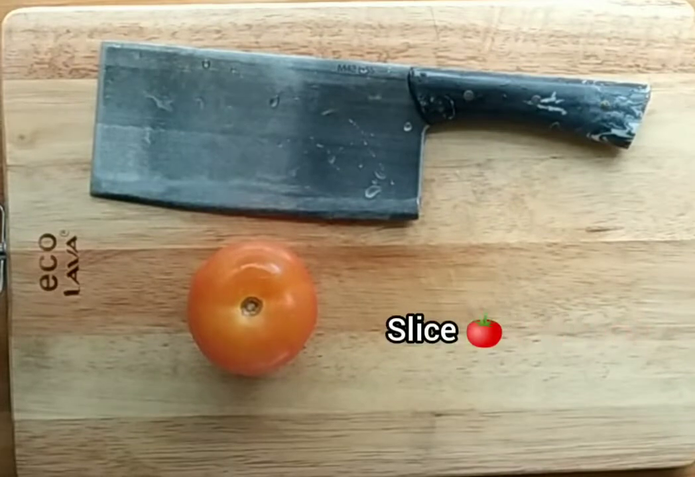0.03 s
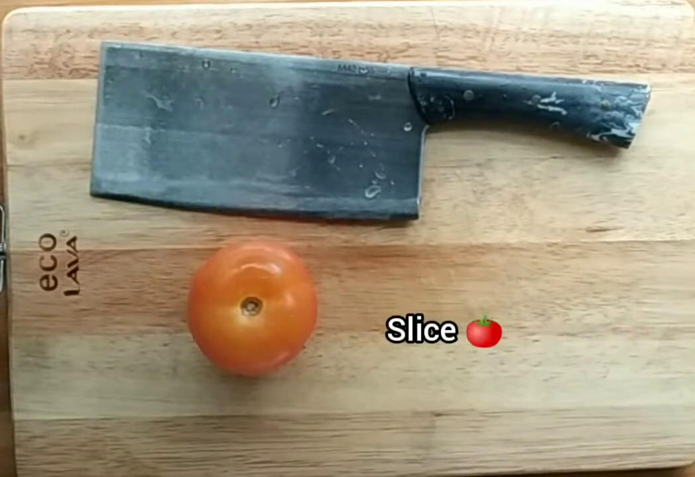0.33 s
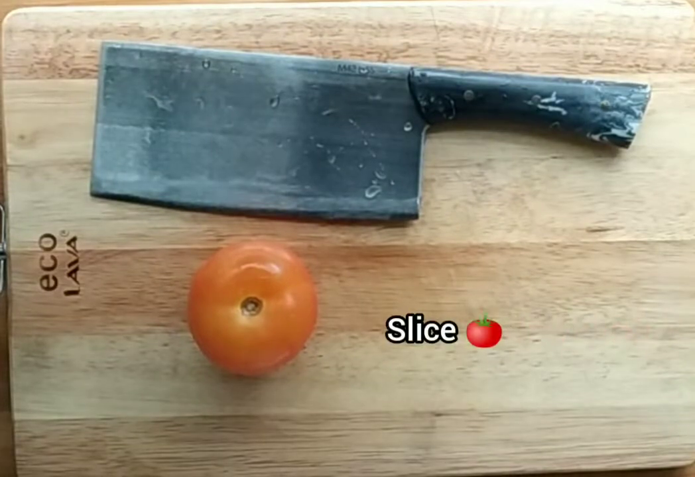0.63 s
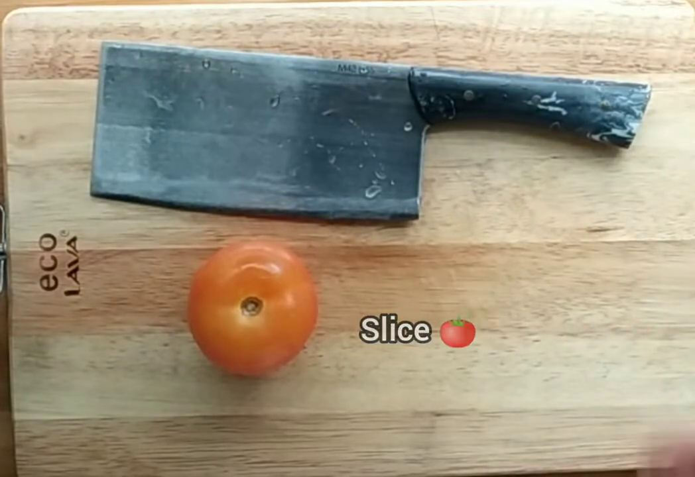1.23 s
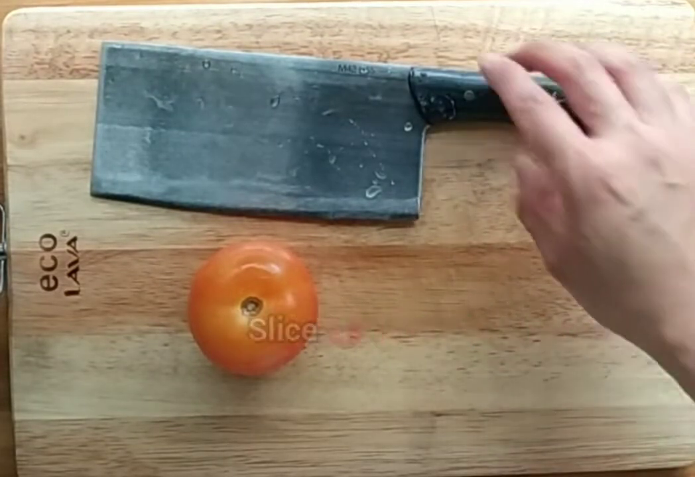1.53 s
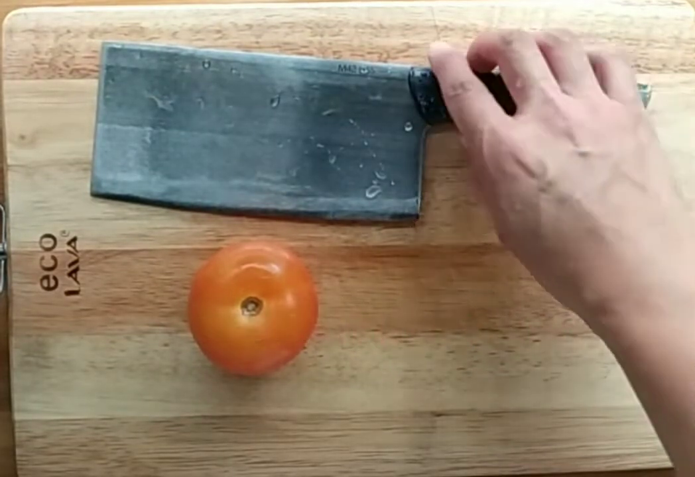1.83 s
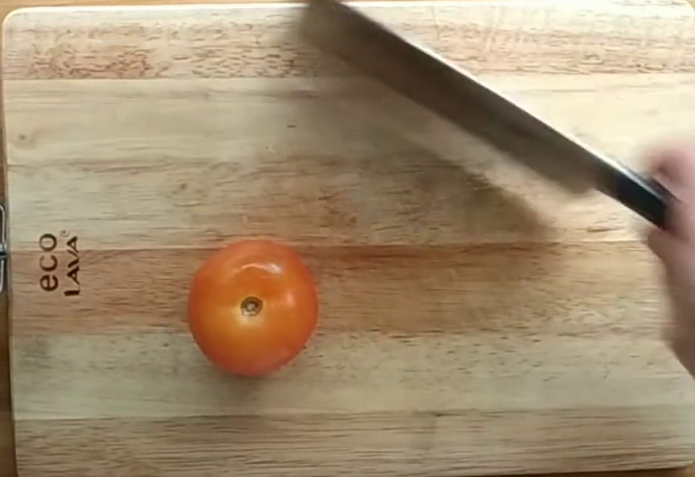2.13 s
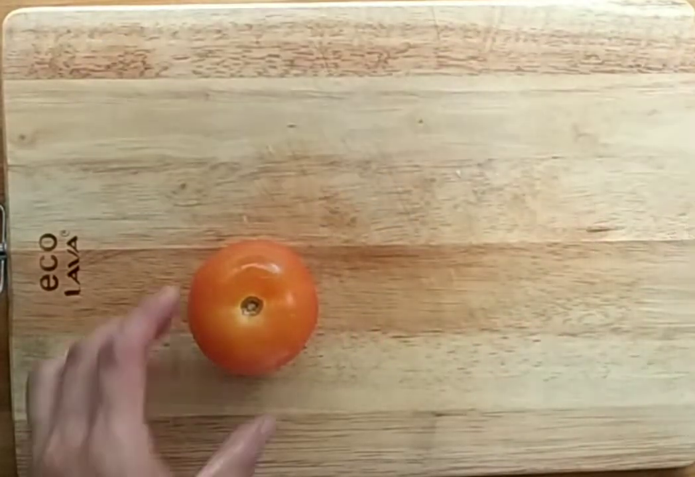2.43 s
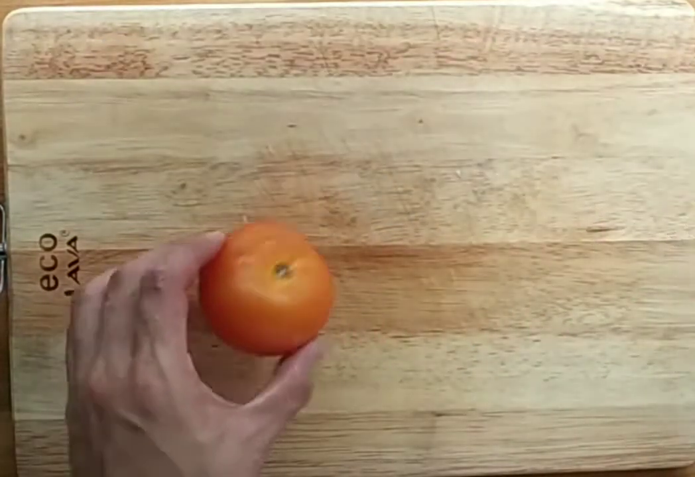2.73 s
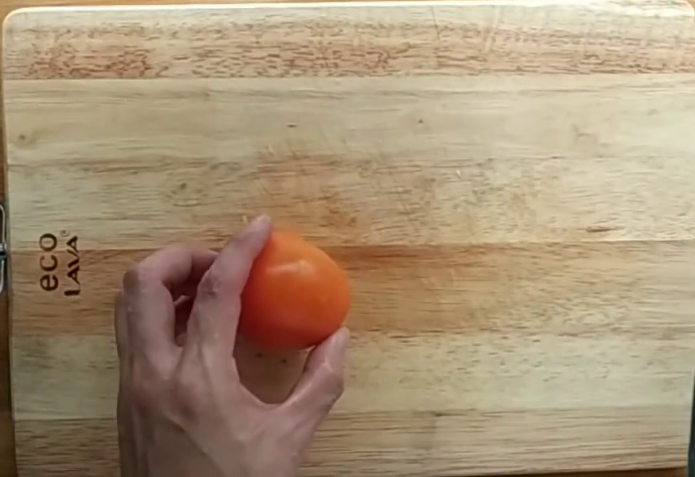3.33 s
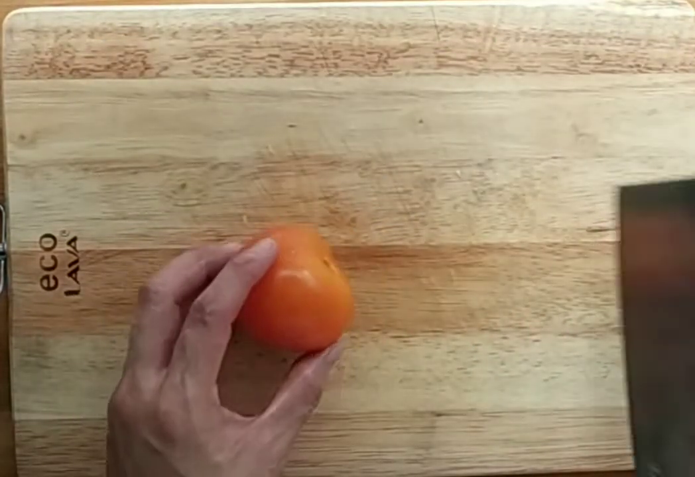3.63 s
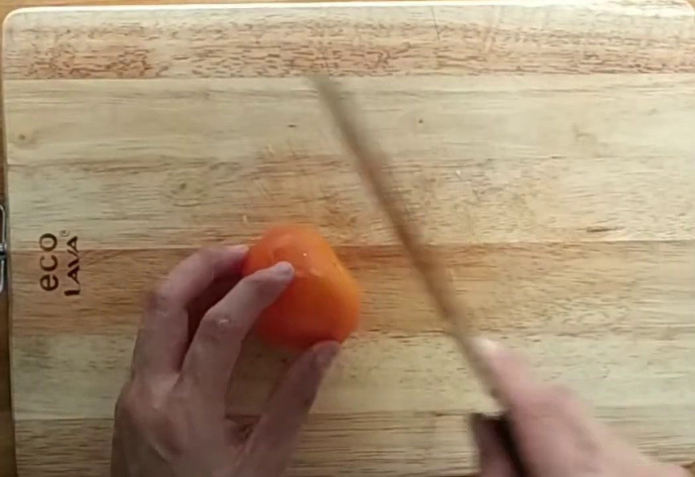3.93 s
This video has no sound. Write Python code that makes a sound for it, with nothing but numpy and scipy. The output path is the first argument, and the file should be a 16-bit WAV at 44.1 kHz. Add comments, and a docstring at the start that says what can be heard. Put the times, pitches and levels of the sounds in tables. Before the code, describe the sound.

A steel cleaver scrapes off a wooden board with a bright clink in a quiet kitchen.

```python
"""In a quiet kitchen, a steel cleaver is lifted off a wooden board. Soft rustles come first as the arm
reaches in, with a faint, far tink and whir. The handle bumps, then the edge scrapes over the wood:
friction excites the blade's modes, which the board damps until the steel comes free with a bright clink.
Behind it all are a low room hum and a thin, high whine that rises about once a second."""
import sys
import numpy as np
from scipy import signal
from scipy.fft import rfft, irfft, next_fast_len
from scipy.io import wavfile
from scipy.ndimage import map_coordinates

SR = 44100
rng = np.random.default_rng(int(sys.argv[2]) if len(sys.argv) > 2 else 0)


def wav_record(signal):
    """Record a signal, one row per channel, as 16-bit PCM in the file named by sys.argv[1]."""
    frames = np.transpose(np.atleast_2d(signal))
    bounded = np.clip(frames, -1, 1)
    # unit amplitude maps onto the largest positive 16-bit level
    quanta = np.round(bounded * 32767).astype(np.int16)
    wavfile.write(sys.argv[1], SR, quanta)


N = 176400
T = np.arange(N) / SR

# Spectra of the room noise, the rustles and the scrape: f/Hz, relative spectral level/dB
ROOM_SPECTRUM = [(12, -33.5), (20, -3), (36, -3), (62, -12), (105, -8), (160, -10), (220, -16),
                 (400, -22.5), (700, -25), (1700, -30.5), (3000, -39.5), (4500, -46.5), (8500, -48),
                 (10700, -52), (11600, -53.5), (15400, -57.5)]
RUSTLE_SPECTRUM = [(500, -6), (2500, -6), (4500, -5.5), (6500, -4), (8500, 1), (10000, -1.5), (12000, -3.5),
                   (15000, -12)]
SCRAPE_SPECTRUM = [(300, -37), (2500, -18), (4000, -9), (6000, -10), (8300, 0), (10000, -5), (12200, 3),
                   (14300, -8), (15300, -3)]
# Coherence of left and right for far and near sources: f/Hz, correlation
FAR_COHERENCE = [(30, 0.95), (125, .96), (250, 0.89), (500, 0.58), (1000, -0.052), (2000, 0.0023),
                 (8000, -0.025)]
NEAR_COHERENCE = [(300, 1), (1000, 0.14), (4000, 0.099), (12000, 0.19)]
# Tones of the hum: f/Hz, initial level/dB
HUM_TONES = [(29, -43), (57.5, -46.5), (91, -49.5)]
# Rustles of the arm: onset t/s, attack/s, hold/s, t60/s, level/dB
RUSTLE_BURSTS = [(.1, .2, .65, 1.2, -63.5), (.335, .05, 0.04, 0.45, -56.5), (0.733, .025, 0.013, 0.23, -58),
                 (0.822, 0.02, 0.012, 0.28, -53.5), (0.879, 0.021, .02, 0.28, -56),
                 (1.462, .035, .035, .3, -57.5), (1.595, .02, .01, .3, -59.5),
                 (1.762, 0.041, 0.023, 0.56, -48), (1.907, 0.025, .02, 0.75, -50.5)]
# Resonances of the tink, the handle and the blade lying on the board: f/Hz, width/Hz, relative level/dB
TINK_RESONANCE = [(5450, 330, 0)]
HANDLE_RESONANCES = [(393, 130, 1.5), (830, 350, -5), (1500, 640, -18)]
BOARD_RESONANCES = [(800, 260, 0), (1206, 200, -5), (1562, 91, 0.5), (1818, 310, -4.5), (2344, 110, -2),
                    (2900, 230, -8)]
# Friction force of the edge on the wood: t/s, relative level/dB
DRAG_FORCE = [(1.99, -40.5), (2.011, -9), (2.026, -4), (2.05, -5), (2.067, 2), (2.083, 1.5), (2.097, -8.5),
              (2.122, -20), (2.17, -21), (2.25, -70)]
# Normal modes of the blade: f/Hz, relative level/dB, t60/s, left minus right/dB
BLADE_MODES = [(2617, -26, .3, 6), (2904, -26, .22, -9), (3803, -23, .2, -2), (3956, -23, .2, 6),
               (4104, -20, .2, -5), (4827, -21, .19, 11), (4984, -24, .2, 4), (5325, -28, .2, -9),
               (5824, -28, .2, 5), (6235, -27, .45, -6), (6932, -23, .16, -1), (7449, 0, .26, -12),
               (7745, -12, .27, 3), (7830, -3, .33, -2), (7971, -17, .28, -10), (8093, -15, .24, -9),
               (8388, -14, .24, 3), (8525, -9, .21, -9), (8673, -18, .2, -3), (9039, -22, .18, -5),
               (9411, -19, .16, 4), (9594, -17, .16, 0), (9747, -21, .16, 3), (10328, -8, .14, 7),
               (10749, -20, .18, -2), (11054, -15, .2, 0), (11571, -17, .2, 1), (11701, -20, .2, 2),
               (11990, -10, .18, 3), (12070, -13, .18, 2), (12427, -13, .21, 7), (12968, -16, .22, -2),
               (13316, -23, .22, 8), (13790, -18, .2, -7), (14790, -27, .18, 2), (15164, -20, .22, 1),
               (15370, -23, .2, 0)]
# Reverberation time of the kitchen: f/Hz, t60/s
KITCHEN_T60 = [(200, 0.31), (2000, 0.27), (8000, 0.35), (15000, 0.26)]

DRAG_START = int(DRAG_FORCE[0][0] * SR)
RINGING = slice(DRAG_START, DRAG_START + int(.6 * SR))  # the samples in which the blade sounds


def amp(db):
    """Amplitude ratio of a level in decibels."""
    return 10 ** (np.asarray(db) / 20)


def unit(x):
    """Normalisation to rms 1."""
    return x / np.sqrt(np.mean(x ** 2) + 1e-20)


def along(points, hz):
    """Interpolation of (f/Hz, value) points on a logarithmic frequency axis."""
    f, v = np.transpose(points)
    return np.interp(np.log(hz + 1), np.log(f + 1), v)


def wobble(rate, t=T):
    """Random modulation: a smooth curve through `rate` Gaussian values a second."""
    return map_coordinates(rng.standard_normal(int(N * rate / SR) + 4), [t * rate])


def filtered(x, response):
    """Linear filtering: the spectrum is multiplied by a frequency response."""
    m = next_fast_len(N + SR // 2)
    return irfft(rfft(x, m) * response(np.fft.rfftfreq(m, 1 / SR)), m)[..., :N]


def colour(points):
    """Spectral envelope through (f/Hz, level/dB) points."""
    return lambda hz: amp(along(points, hz))


def resonances(peaks):
    """Superposition of squared band-pass responses, alternating in sign."""
    return lambda f: sum((-1) ** k * amp(db) * (1j * f * width / (hz * hz - f * f + 1j * f * width)) ** 2
                         for k, (hz, width, db) in enumerate(peaks))


def noise(response, coherence):
    """Partially coherent stereo noise of rms 1: the ratio of mid to side sets the correlation."""
    def mid_side(hz):
        angle = np.arccos(np.clip(along(coherence, hz), -1, 1)) / 2
        return response(hz) * np.array([np.cos(angle), np.sin(angle)])
    mid, side = filtered(rng.standard_normal((2, N)), mid_side)
    return unit(np.array([mid + side, mid - side]))


def gliding_band(hz, width_hz):
    """Frequency shifting: a gliding carrier moves low-pass noise to a narrow band near hz."""
    baseband = noise(lambda f: np.exp(-(f / width_hz) ** 2), FAR_COHERENCE[-1:])
    carrier = np.exp(2j * np.pi * np.cumsum(hz - width_hz / 2) / SR)
    return unit(np.real(signal.hilbert(baseband) * carrier))


def envelope(start, attack, hold, t60, db):
    """Linear attack, hold and exponential decay, with times in seconds."""
    fall = np.maximum(T - start - attack - hold, 0) / t60
    return np.clip((T - start) / attack, 0, 1) * amp(db) * np.exp(-np.log(1000) * fall)


def room_hum(fade_db_per_s=1.3):
    """Superposition of steady broadband rumble and low tones that waver and slowly fade."""
    tones = sum(amp(db + 1.7 * wobble(4)) * np.sqrt(2) * np.sin(2 * np.pi * hz * T + .86 * wobble(5))
                for hz, db in HUM_TONES)
    rumble = amp(-38.5) * noise(colour(ROOM_SPECTRUM), FAR_COHERENCE)
    return rumble + amp(-fade_db_per_s * T) * tones


def whine(period_s=1.14, restart_s=.39, fade_s=.08, low_hz=9400, high_hz=9940):
    """Sawtooth modulation: a narrow band climbs, swells and starts again, over a steady hiss."""
    cycle = (T - restart_s) / period_s % 1
    band = gliding_band(low_hz + (high_hz - low_hz) * cycle, width_hz=540)
    level_db = -61.5 + 12 * np.minimum(cycle - .7, 0)  # full from 70 % of the cycle
    fade = np.sqrt(np.clip((1 - cycle) * period_s / fade_s, 0, 1))
    hiss = amp(-64) * noise(resonances([(9490, 1560, 0)]), FAR_COHERENCE)
    return fade * amp(level_db) * band + hiss


def rustles():
    """Light friction, as of a sleeve, gives soft bursts of broadband noise."""
    bursts = sum(envelope(*row) for row in RUSTLE_BURSTS)
    return bursts * unit(amp(.96 * wobble(300)) * noise(colour(RUSTLE_SPECTRUM), NEAR_COHERENCE))


def tink():
    """A single narrow resonance sounds faintly across the room and decays."""
    ring = noise(resonances(TINK_RESONANCE), FAR_COHERENCE)
    return envelope(start=.12, attack=.07, hold=.005, t60=.25, db=-59.5) * ring


def whir(start_s=.5, start_hz=1304, sag_per_s=.49):
    """An exponential glide: a faint, far band of noise sinks in pitch and fades."""
    band = gliding_band(start_hz * np.exp(-sag_per_s * (T - start_s)), width_hz=340)
    return envelope(start_s, attack=.05, hold=.43, t60=1.6, db=-54.5) * band


def handle_bump():
    """Impact on the board excites the handle's broad, heavily damped resonances."""
    thud = noise(resonances(HANDLE_RESONANCES), NEAR_COHERENCE)
    return envelope(start=1.911, attack=.012, hold=.015, t60=.14, db=-41) * thud


def drag_force():
    """Sliding friction acts on the edge only during the stroke."""
    times, db = np.transpose(DRAG_FORCE)
    return amp(np.interp(T, times, db)) * (T > times[0]) * (T < times[-1])


def scrape(force):
    """Friction noise follows the force on the edge, and the board resonates beneath it."""
    grit = unit(amp(2.5 * wobble(700)) * noise(colour(SCRAPE_SPECTRUM), NEAR_COHERENCE))
    wood = unit(amp(2.1 * wobble(150)) * noise(resonances(BOARD_RESONANCES), NEAR_COHERENCE))
    slide = envelope(start=2, attack=.0234, hold=.06, t60=.31, db=-40)
    return amp(-39) * force * grit + slide * wood


def stored_amplitude(drive, t60):
    """Energy balance: a resonator gains from the drive and loses by damping; peak amplitude 1."""
    retained = np.exp(-2 * np.log(1000) / (t60 * SR))
    swell = np.sqrt(signal.lfilter([1], [1, -retained], drive ** 2))
    return swell / swell.max()


def blade_chatter(force, width_hz=85, contrast=.72):
    """Random forcing by friction spreads each mode of the blade into a rough, narrow band."""
    rub = force[RINGING]
    f = np.fft.rfftfreq(len(rub), 1 / SR)
    sides = []
    for sign in (1, -1):
        # a contrast below 1 evens out the levels of the modes
        peaks = [(hz, width_hz, contrast * (db + sign * pan_db / 2)) for hz, db, _, pan_db in BLADE_MODES]
        sides.append(resonances(peaks)(f))
    bands = irfft(rfft(rng.standard_normal((2, len(rub)))) * np.array(sides), len(rub))
    out = np.zeros((2, N))
    out[:, RINGING] = amp(-34.5) * stored_amplitude(rub, t60=.2) * unit(bands)
    return out


def blade_ring(force, free_s=2.058, release_s=.0047, held_db=-17, beat_hz=26):
    """Free vibration: the modes store energy from the drag and ring on; close pairs of them beat."""
    t, rub = T[RINGING], force[RINGING]
    free = (1 + np.tanh((t - free_s) / release_s)) / 2
    drive = rub * amp(held_db * (1 - free))  # the wood restrains the steel until it lifts clear
    out = np.zeros((2, N))
    for hz, db, t60, pan_db in BLADE_MODES:
        swell = stored_amplitude(drive, t60)
        scatter = .035 * np.cumsum(rub * rng.standard_normal(len(t)))  # rubbing disturbs the phase
        phase = 2 * np.pi * hz * t + scatter
        twin = phase + 2 * np.pi * (beat_hz * rng.uniform(.5, 2) * t + rng.random())
        for side, sign in enumerate((1, -1)):
            gain = amp(-31 + db + sign * pan_db / 2 + 2.5 * wobble(45, t))
            pair = np.sin(phase + rng.normal(0, .57)) + .45 * np.sin(twin)
            out[side, RINGING] += gain * swell * pair
    return out


def kitchen_reverb(x):
    """Reflections from hard walls form a short diffuse tail that decays exponentially in each band."""
    hz, t, spectra = signal.stft(rng.standard_normal((2, SR // 2)), SR, nperseg=256)
    decay = np.exp(-np.log(1000) * t / along(KITCHEN_T60, hz)[:, None])
    tail = signal.istft(spectra * decay, SR, nperseg=256)[1]
    return signal.fftconvolve(x, tail / np.linalg.norm(tail[0]), axes=1)[:, :N]


def scene():
    """Superposition of the cleaver's direct sound, its reverberation and the quieter sources."""
    force = drag_force()
    cleaver = blade_ring(force) + blade_chatter(force) + scrape(force) + handle_bump()
    reverberation = amp(-13) * kitchen_reverb(cleaver)
    return cleaver + reverberation + rustles() + tink() + room_hum() + whine() + whir()


def record(dry):
    """Band limiting: an ideal low-pass filter removes everything above 15.5 kHz."""
    return filtered(dry, lambda hz: hz < 15500)


dry = scene()
out = record(dry)
wav_record(out)
```